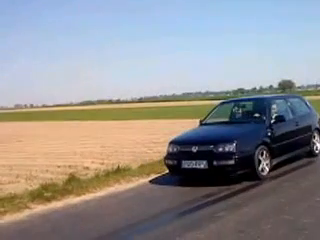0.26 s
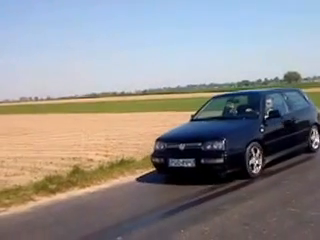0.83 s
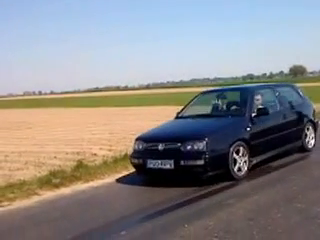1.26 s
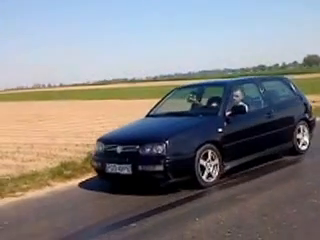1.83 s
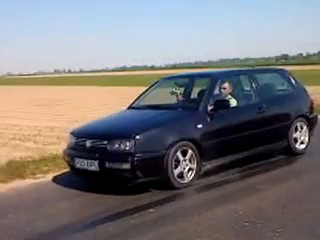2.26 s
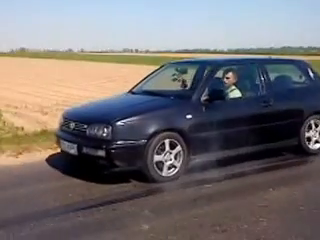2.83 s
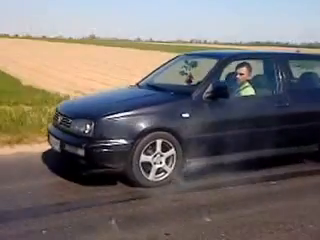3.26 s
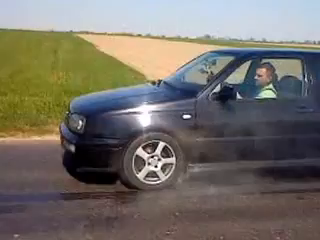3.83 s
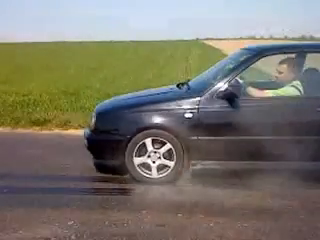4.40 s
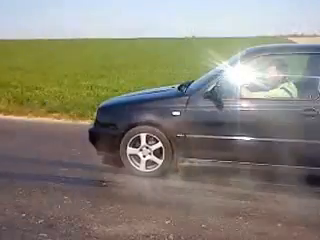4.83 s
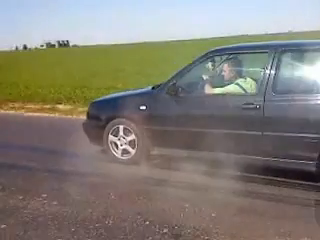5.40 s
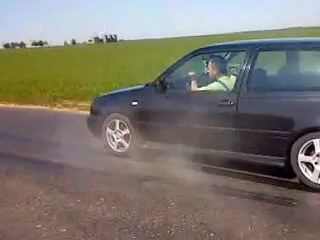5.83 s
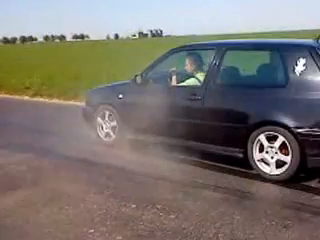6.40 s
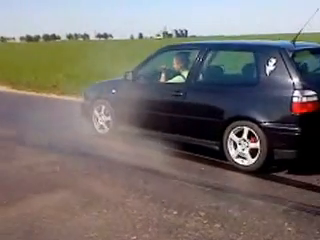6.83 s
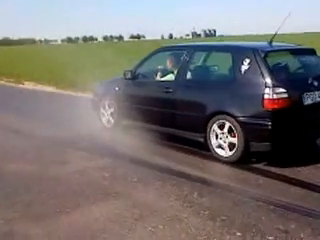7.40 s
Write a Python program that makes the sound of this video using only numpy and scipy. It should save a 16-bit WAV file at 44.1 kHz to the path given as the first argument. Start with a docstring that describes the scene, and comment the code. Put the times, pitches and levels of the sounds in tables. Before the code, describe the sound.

A diesel car does a slow burnout past a small microphone on an open road, with no echo. At first the engine labours at low revs, rumbling and clattering. At about 0.2 seconds the front tyre breaks loose with a loud, stuttering squeal that fades by 0.7 seconds, leaving a gritty scrubbing hiss that continues underneath. From about 1 second the revs climb and the engine grows louder, roughly doubling in pitch by 2.5 seconds. It then holds a high, steady exhaust drone with hard diesel rattle until the end at about 7.5 seconds. A very faint turbo whistle appears around 3.4 seconds. The tone shifts as the nose, side and tail go by, the drone dipping briefly near 5.6 seconds. Light wind buffets the microphone in the first two seconds and again between 6 and 7 seconds.

```python
"""On an open country road, a four-cylinder turbodiesel hatchback creeps past a small camera in a burnout.
The front tyre chirps as it breaks loose, ducking the camera's gain, then scrubs while the engine
climbs and is held high. The firings make the exhaust drone and the body rumble, the block clatters,
and the tone turns as nose, flank and tail face us. Wind nudges the microphone."""
import sys
import numpy as np
from scipy import signal
from scipy.fft import rfft, irfft, next_fast_len
from scipy.io import wavfile
from scipy.ndimage import uniform_filter1d, minimum_filter1d, map_coordinates

SR = 44100
rng = np.random.default_rng(int(sys.argv[2]) if len(sys.argv) > 2 else 0)


def put_to_file(sound):
    """Save the sound as 16-bit audio at rate SR, in the file named by the first command-line argument."""
    columns = np.atleast_2d(sound).T  # one column per channel
    safe = np.clip(columns, -1, 1)
    whole_steps = np.round(safe * 32767)
    wavfile.write(sys.argv[1], SR, whole_steps.astype(np.int16))


N = 332955
TIME = np.arange(N) / SR
CYLINDERS, SHIFTS_PER_S = 4, 4  # a shift is one step in the slow drift of the engine's timbre


def undb(db):
    """Decibels to gain."""
    return 10 ** (np.asarray(db) / 20)


def unit(x):
    """Scale to rms 1."""
    return x / np.sqrt(np.mean(x ** 2))


def curve(table):
    """A timed table, sample by sample."""
    return np.interp(TIME, *np.transpose(table))


def noise():
    """White noise."""
    return rng.standard_normal(N)


def walk(rate, size=N):
    """Random levels, rate a second, joined by straight lines; spread near 1."""
    steps = np.arange(size) * (rate / SR)
    return np.sqrt(3 / 2) * np.interp(steps, np.arange(N // 32), rng.standard_normal(N // 32))


def colour(x, tone):
    """Shape a sound by (Hz, dB) points; rms 1."""
    size = next_fast_len(N)
    hz, db = np.transpose(tone)
    bins = np.maximum(np.arange(size // 2 + 1) * SR / size, 1)
    eq_db = np.interp(np.log(bins), np.log(hz), db, left=-90, right=-90)
    return unit(irfft(rfft(x, size) * undb(eq_db), size)[:N])


def band(x, hz, width_hz):
    """One resonance, gain 1 at its centre."""
    return signal.lfilter(*signal.iirpeak(hz, hz / width_hz, fs=SR), x)


def ring(x, hz, width_hz):
    """A resonance with steep sides; rms 1."""
    return unit(band(band(x, hz, width_hz), hz, width_hz))


def swell(t, length):
    """A smooth bump around t = 0."""
    return np.exp(-(2 * t / length) ** 2)


def passing(s, length):
    """The samples around time s, and a smooth bump over them."""
    near = slice(max(int((s - 1.5 * length) * SR), 0), int((s + 1.5 * length) * SR))
    return near, swell(TIME[near] - s, length)


def harmonic_phases(drift=0.14, size=513):
    """Each engine harmonic's phase, in turns; the higher ones drift slowly as the car moves."""
    steps = rng.standard_normal((int(N / SR * SHIFTS_PER_S) + 2, size))
    return rng.random(size) + np.cumsum(drift * np.tanh(np.arange(size) / 30) * steps, axis=0)


def harmonic(cycle, phases, order, near=slice(None), stray=0):
    """A sine of rms 1 at a multiple of the cycle rate."""
    order = round(order)
    phase = np.interp(TIME[near] * SHIFTS_PER_S, np.arange(len(phases)), phases[:, order])
    return np.sqrt(2) * np.cos(2 * np.pi * (order * cycle[near] + phase + stray))


# The revs bog down, climb and hold high. Each row: time in seconds, firing rate in Hz.
REVS = [(0, 72.2), (.26, 66), (.7, 66.5), (1, 75), (1.25, 89), (1.53, 107.6), (1.68, 117.8), (1.87, 127.7),
        (2.1, 137.5), (2.35, 146.6), (2.55, 149.6), (2.8, 151.1), (3.3, 150.8), (3.55, 149.8),
        (4.25, 149.9), (4.65, 150.6), (5.6, 151.2), (6.1, 151), (7.1, 152.1), (7.55, 153.8)]
def crank(jitter=0.00043):
    """The crank turns a little unevenly: gives firing rate in Hz and engine cycles run."""
    firing_hz = curve(REVS) * (1 + jitter * walk(40))
    return firing_hz, np.cumsum(firing_hz) / SR / CYLINDERS


# The drone swells on the climb and dips as the body shades the pipe.
# Each row: time in seconds, level in dB.
DRONE_LEVEL = [(0, -34), (.17, -31), (.4, -32), (.75, -30), (1.38, -35), (1.53, -23), (1.85, -18.5),
               (2.6, -15.5), (3.5, -17), (4.6, -14.5), (5.65, -19.5), (6.4, -15.5), (7.55, -16.5)]
# The lope around the drone. Each row: multiple of the cycle rate, level in dB against the drone.
LOPE_LINES = [(3, -27), (5, -23.5), (6, -25.5), (7, -13), (8, -21), (9, -24), (10, -19.5), (11, -26.5),
              (12, -19.5), (13, -25), (14, -28.5)]
def exhaust(cycle, phases, waver_db=2.0, flutter_db=0.23, rough_db=1.0):
    """Four firings a cycle make the drone; unequal cylinders add weaker, rougher lines."""
    lope = sum(undb(db + waver_db * walk(2.2) + rough_db * walk(60)) * harmonic(cycle, phases, order)
               for order, db in LOPE_LINES)
    level = undb(curve(DRONE_LEVEL) + flutter_db * walk(30))
    return level * (harmonic(cycle, phases, CYLINDERS) + lope)


def knocks(cycle, phases, uneven_db=4.0, firing_db=2.0):
    """Injectors, valves and pistons rattle alike each cycle; the pattern drifts as the car moves."""
    orders = np.arange(phases.shape[1])
    on_firing = (orders % CYLINDERS == 0) & (orders < 56)
    strength = undb(uneven_db * rng.standard_normal(phases.shape) + firing_db * on_firing)
    patterns = irfft(strength * np.exp(2j * np.pi * phases))  # one cycle of rattle per shift
    position = [TIME * SHIFTS_PER_S, cycle % 1 * patterns.shape[1]]
    return unit(map_coordinates(patterns, position, order=1, mode="grid-wrap"))


# The clatter's EQ from four sides of the car. Each row: frequency in Hz, gain in dB.
FRONT_EQ = [(320, -31), (540, -14.5), (684, -11), (745, -3.5), (875, -8), (974, -5), (1330, -18),
            (1480, -6.5), (2180, -13.5), (2610, -8), (3030, -14), (4050, -20), (4410, -32.5), (5180, -15.5),
            (7000, -58), (9100, -62), (15400, -120)]
NOSE_EQ = [(320, -38), (540, -14), (847, 2), (1070, 3.5), (1170, 5.5), (1400, -5), (1540, 0), (1660, 2),
           (2080, -1.5), (2610, -1), (3490, -13), (3920, -36), (4560, -21), (5410, -9), (7000, -36.5),
           (9100, -57), (15400, -120)]
FLANK_EQ = [(320, -45), (540, -20), (627, -17), (729, -3), (794, -5), (1060, -3), (1310, -5.5),
            (1460, -12.5), (1630, -3), (2060, -3), (3070, -11.5), (3880, -21.5), (6160, -26.5), (7000, -68),
            (9100, -72), (15400, -120)]
TAIL_EQ = [(320, -47), (540, -30), (570, -19.5), (662, -6), (884, 1), (963, -2), (1210, 1), (1400, -7.5),
           (1680, 0.5), (1890, -2.5), (3100, -5.5), (3920, -18), (5300, -17), (7000, -23.5), (9100, -101.5),
           (15400, -120)]
# The crossfade between them.
# Each row: time in seconds, side facing us (0 front, 1 corner of the nose, 2 flank, 3 tail).
SIDE_FACING = [(0, .3), (1.2, .3), (1.7, 0), (2.4, 1), (3.7, 1.2), (4.4, 2), (4.9, 2.1), (5.4, 2.8),
               (7.55, 3)]
# Ringing panels beam at us in passing. Each row: peak time in seconds, length in seconds,
# pitch in Hz, width in Hz, level in dB against the clatter.
PANEL_RINGS = [(0.304, 1.5, 2500, 226, -13), (1.048, 1.3, 3180, 202, -19), (1.405, 1.2, 4020, 260, -18.5),
               (1.302, 0.9, 1166, 205, -11), (1.305, 0.66, 2640, 220, -19), (1.849, 0.96, 1730, 260, -12.5),
               (1.689, 1.2, 5500, 443, -24), (1.948, 0.98, 1157, 550, -15), (2.949, .9, 1770, 160, -11),
               (3.301, 2.2, 1313, 112, -14), (3.55, 0.14, 1340, 120, -13), (3.687, 0.3, 1670, 160, -13),
               (3.646, 1.3, 2110, 161, -11.5), (3.8, 0.72, 2805, 220, -15), (3.8, 1.1, 3100, 505, -11.5),
               (4.305, .35, 2970, 406, -15), (4.9, .5, 1790, 200, -14), (5.296, 0.56, 2895, 108, -15),
               (5.55, 1, 2110, 252, -17), (5.7, 0.51, 3020, 396, -16.5), (5.898, 0.6, 1100, 220, -20),
               (6.753, 0.6, 2316, 300, -14.5), (6.704, 0.7, 2470, 200, -18), (7.005, 1.1, 3060, 260, -15.5),
               (7.1, 1.7, 5230, 700, -23.5), (7.407, .7, 1620, 262, -18)]
def clatter(cycle, phases, steady, held_share, throb=0.061, grit_db=1.5, panel_scrub=0.25):
    """Engine rattle and scrubbing rubber swell at each firing, coloured by the side that faces us."""
    strain = np.maximum(1 - steady / held_share, 0)
    mistiming = (0.0005 + 0.011 * strain) * walk(150)  # knocks come early or late, most at low revs
    rattle = knocks(cycle + mistiming, phases)
    scrub = noise() * undb(grit_db * walk(200))
    drive = np.sqrt(steady) * rattle + np.sqrt(1 - steady) * scrub
    drive *= 1 + throb * np.cos(2 * np.pi * CYLINDERS * cycle)
    facing = curve(SIDE_FACING)
    out = sum(np.maximum(1 - abs(facing - side), 0) * colour(drive, eq)
              for side, eq in enumerate([FRONT_EQ, NOSE_EQ, FLANK_EQ, TAIL_EQ]))
    for s, length, hz, width_hz, db in PANEL_RINGS:
        near, bump = passing(s, length)
        out[near] += undb(db) * bump * ring(drive[near] + panel_scrub * scrub[near], hz, width_hz)
    return out / np.sqrt(uniform_filter1d(out ** 2, SR // 2))  # panels redirect power, they add none


# The low weight of the body shell. Each row: frequency in Hz, gain in dB.
BODY_EQ = [(60, -6), (120, 0.5), (240, 1.5), (380, 4.5), (480, -1), (580, -15.5), (800, -24.5)]
def rumble(cycle, steady, throb=0.42, boom_hz=235.0, boom_width_hz=37.0, boom_db=-16.0):
    """Each firing shakes the body shell and its boom, hardest while the engine labours."""
    shake = noise() * (1 + throb * np.cos(2 * np.pi * CYLINDERS * cycle))
    boom = undb(boom_db) * ring(shake, boom_hz, boom_width_hz)
    return (colour(shake, BODY_EQ) + boom) * undb(1.5 - 28.7 * steady)


# The wind's bassy bluster. Each row: frequency in Hz, gain in dB.
WIND_EQ = [(15, -16.5), (35, -4), (70, -1), (110, -4), (200, -11), (500, -34)]
# Short buffets, and at 0.85 s and 1.2 s low thumps as the engine rocks on its mounts. Each row: peak time in
# seconds, length in seconds, level in dB.
BUFFETS_AND_THUMPS = [(0.167, 0.1, -23), (.78, 0.25, -29), (.85, 0.04, -21), (1.198, 0.028, -19.5), (1.42, 0.15, -31),
                      (1.735, 0.076, -31), (6.163, 0.13, -31), (6.462, .08, -30), (6.754, .07, -33),
                      (6.898, 0.12, -23.5)]
def wind(breeze_db=-31, waver_db=5.0, lull_db=-16.5, lull_s=4.74, lull_length_s=5.4):
    """A wavering breeze on the microphone, with one long lull, low buffets and the engine's short thumps on its
    mounts on top."""
    lull = swell(TIME - lull_s, lull_length_s)
    breeze = undb(breeze_db + lull_db * lull + waver_db * walk(13))
    gusts = sum(undb(db) * swell(TIME - s, length) for s, length, db in BUFFETS_AND_THUMPS)
    return colour(noise(), WIND_EQ) * (breeze + gusts)


# The tyre's bright sizzle. Each row: frequency in Hz, gain in dB.
HISS_EQ = [(2500, -17), (3500, -1.5), (4000, 2), (4550, -2.5), (5300, -4.5), (5900, -5), (6600, -7),
           (7200, -23.5)]
# Its fader, with a scuff as the tread lets go. Each row: time in seconds, level in dB.
HISS_LEVEL = [(0, -43), (.19, -34.5), (.215, -20), (.3, -27.5), (1.6, -29.5), (2.3, -30), (4, -28),
              (4.9, -33), (5.3, -30), (6.2, -37), (7.55, -33.5)]
def tyre_hiss(cycle, cycles_per_turn=5, wobble_db=0.5, grit_db=1.5):
    """The tread grinds over grit, a little harder twice in each turn of the wheel."""
    wobble = np.sin(2 * np.pi * 2 * cycle / cycles_per_turn)
    grit = noise() * undb(grit_db * walk(400))
    return colour(grit, HISS_EQ) * undb(curve(HISS_LEVEL) + wobble_db * wobble)


def squeal(hz, jitter):
    """One mode of the slipping tread: a sine with a shaky pitch."""
    return np.sin(2 * np.pi * np.cumsum(hz * (1 + jitter * walk(700))) / SR)


# The tyre breaks loose. Each row: peak time in seconds, length in seconds, pitch in Hz, glide to
# either side in Hz, level in dB, overtone in Hz, its level in dB, jitter as a share of the pitch.
TYRE_SLIPS = [(0.228, 0.024, 1720, -90, -8, 3270, -18, 0.08), (0.249, .03, 1630, -7, 0, 3176, -10, 0.02),
              (0.272, 0.028, 1635, -2, -3.5, 3250, -21, 0),
              (0.282, 0.0066, 1660, 27, -3.5, 3360, -21, .012),
              (0.299, 0.018, 1684, 22, -6, 3390, -12, .02), (0.315, 0.019, 1670, 34, -7, 3660, -17, 0.04),
              (0.34, 0.022, 1775, -21.5, -10, 3560, -22, 0.03),
              (0.371, 0.026, 1743, 11, -12.5, 3300, -27, 0.01),
              (0.392, 0.0245, 1660, -21, -11, 3280, -20, .025),
              (0.45, 0.028, 1750, 46, -12, 3540, -20.5, .022),
              (.508, 0.041, 2160, 47, -16.5, 4070, -21, .05), (0.551, 0.013, 2100, -6, -20, 4100, -25, .05),
              (.639, 0.014, 2150, 50, -14.5, 4000, -11.5, 0.05)]
def tyre_chirps(rough_db=1.5, over_shake=1.93, side_ratio=1.25, side_db=-19):
    """The tread sticks and slips in a stuttering squeal, with a weaker mode above and an overtone."""
    power, weighted = np.full(N, 1e-18), np.zeros((4, N))
    for s, length, hz, glide_hz, db, over_hz, over_db, jitter in TYRE_SLIPS:
        near, bump = passing(s, length)
        bend = 1 + glide_hz / hz * np.tanh((TIME[near] - s) / length)
        slip = (undb(db) * bump) ** 2
        power[near] += slip
        weighted[:, near] += [slip * v for v in (hz * bend, over_hz * bend, undb(over_db - db), jitter)]
    hz, over_hz, over_gain, jitter = weighted / power  # the strongest slip sets the tone
    modes = squeal(hz, jitter) + undb(side_db) * squeal(side_ratio * hz, jitter)
    modes += over_gain * squeal(over_hz, over_shake * jitter)
    return np.sqrt(2 * power) * modes * undb(rough_db * walk(330))


# Passing hollows in the car's tone. Each row: deepest moment in seconds, length in seconds,
# centre in Hz, width in Hz, depth in dB.
ROAD_NOTCHES = [(3.25, 1.2, 3800, 480, -9), (3.25, .6, 5550, 400, -2.5), (4.65, 0.89, 2200, 700, -8.5),
                (4.5, 0.78, 1730, 210, -10.5), (4.97, 0.26, 1000, 230, -5), (6.7, 0.92, 1200, 140, -9.5),
                (.5, 0.95, 4400, 280, -3), (.55, 0.61, 480, 220, -5.5), (4.45, 0.18, 450, 70, -7),
                (7.05, 1.6, 2870, 310, -9), (6.76, 1.1, 2030, 240, -6.5), (7.3, 0.58, 4000, 940, -7)]
def road_bounce(x):
    """The bounce off the asphalt cancels the direct sound in one band after another."""
    out = x.copy()
    for s, length, hz, width_hz, db in ROAD_NOTCHES:
        near, bump = passing(s, length)
        out[near] += (undb(db * bump) - 1) * band(out[near], hz, width_hz)
    return out


# Engine notes that sing out for a while. Each row: peak time in seconds, length in seconds,
# multiple of the cycle rate, level in dB within the engine mix.
SINGING_NOTES = [(1.076, 0.13, 12, -2), (1.148, .1, 18, -7), (1.242, 0.29, 8, -1), (1.335, 0.21, 12, -5),
                 (1.35, 0.079, 14, -6), (1.53, .2, 9, -0.5), (1.6, 0.39, 28, -12), (1.873, .5, 8, -3),
                 (2.091, 0.46, 12, -5.5), (2.29, 0.31, 8, -9.5), (2.448, .3, 31, -18), (2.6, .6, 23, -15.5),
                 (2.6, 1.7, 10, -18.5), (2.8, 1, 20, -8.5), (2.995, 1.8, 34, -16), (3.208, 0.7, 24, -11.5),
                 (3.2, 1.2, 48, -23), (3.348, 0.75, 12, -10.5), (3.396, 1.8, 43, -20),
                 (3.642, 1.7, 28, -7.5), (3.6, 0.87, 5, -20), (3.795, 1.2, 7, -20.5),
                 (3.795, 0.76, 8, -13.5), (3.9, 0.7, 29, -12), (4.024, 0.41, 12, -9), (4.3, 0.6, 34, -15),
                 (4.3, .6, 26, -14.5), (4.548, 0.83, 7, -15), (4.603, 1.2, 32, -13.5),
                 (4.597, 1.3, 23, -15.5), (4.702, 1.3, 20, -18), (4.746, 1.5, 18, -16),
                 (4.803, .8, 8, -19.5), (4.843, 0.76, 49, -14.5), (4.95, 0.7, 46, -6.5),
                 (5.102, 0.88, 30, -21), (5.303, 1.8, 12, -6.5), (5.502, .9, 43, -7.5),
                 (5.748, 1.2, 8, -2.5), (5.8, 0.98, 27, -15.5), (5.9, 0.6, 32, -15), (5.955, 0.61, 46, -19),
                 (6.095, 1.2, 24, -15), (6.195, 1.7, 7, -14), (6.204, 1.4, 10, -22.5),
                 (6.645, 0.72, 60, -10.5), (6.8, 1.3, 41, -23), (6.9, 1.6, 43, -17.5),
                 (6.905, 0.66, 31, -12), (6.998, 1.9, 39, -15.5), (7.1, 1.2, 44, -22),
                 (7.101, 1.2, 28, -13), (7.164, 1, 20, -11.5), (7.303, .9, 24, -13.5),
                 (7.453, 0.58, 12, -15.5)]
def singing(cycle, phases, steady, waver_db=1.56, wander=0.06, rough_db=2.5, judder=0.12):
    """Harmonics stand out where direct sound and road bounce agree; rough while the engine labours."""
    out, labour = np.zeros(N), (1 - steady) ** 2
    for s, length, order, db in SINGING_NOTES:
        near, bump = passing(s, length)
        size = len(bump)
        stray = wander * walk(14, size) + judder * labour[near] * walk(70, size)
        level_db = db + waver_db * walk(12, size) + rough_db * labour[near] * walk(60, size)
        out[near] += undb(level_db) * bump * harmonic(cycle, phases, order, near, stray)
    return out


def turbo(firing_hz, peak_s=3.4, length_s=0.95, whistle_hz=6080, whistle_db=-43, jitter=0.0036):
    """A faint turbo whistle rides on the engine speed as the boost peaks."""
    relative_speed = firing_hz / np.interp(peak_s, *np.transpose(REVS))
    pitch = whistle_hz * relative_speed * (1 + jitter * walk(120))
    whistle = np.sqrt(2) * np.sin(2 * np.pi * np.cumsum(pitch) / SR)
    return undb(whistle_db) * swell(TIME - peak_s, length_s) * whistle


def scene(labour_hz=65, pulling_hz=92.4, held_hz=153.6, held_share=0.48):
    """The crank drives the car; with revs the clatter grows louder and more even. Fields give no echo."""
    revs_hz = curve(REVS)
    engine_db = np.interp(revs_hz, [labour_hz, pulling_hz], [-25.5, -20.5])
    steady = held_share * (revs_hz / held_hz) ** 2.26  # share of the clatter that repeats each cycle
    firing_hz, cycle = crank()
    phases = harmonic_phases()
    engine = undb(2.5) * clatter(cycle, phases, steady, held_share)
    engine += singing(cycle, phases, steady) + rumble(cycle, steady)
    car = exhaust(cycle, phases) + undb(engine_db) * engine + tyre_hiss(cycle) + turbo(firing_hz)
    return (road_bounce(car) + tyre_chirps() + wind())[None]


def gain_control(x, ceiling_db=-9.5, recovery_db_per_s=9):
    """Anything over the ceiling pulls the gain down a moment ahead; it creeps back at a steady rate."""
    power = uniform_filter1d(x ** 2, size=660)
    over_db = 10 * np.log10(np.maximum(power / undb(ceiling_db) ** 2, 1))
    recovered_db = recovery_db_per_s * TIME
    gain_db = recovered_db - np.maximum.accumulate(over_db + recovered_db, axis=-1)
    early_db = minimum_filter1d(gain_db, size=1300)
    return x * undb(uniform_filter1d(early_db, size=440))


def record(dry):
    """The small camera rides its gain and cuts the treble steeply."""
    treble_cut = signal.ellip(8, .2, 80, 7050, fs=SR, output="sos")
    return signal.sosfilt(treble_cut, gain_control(dry))


dry = scene()
out = record(dry)
put_to_file(out)
```